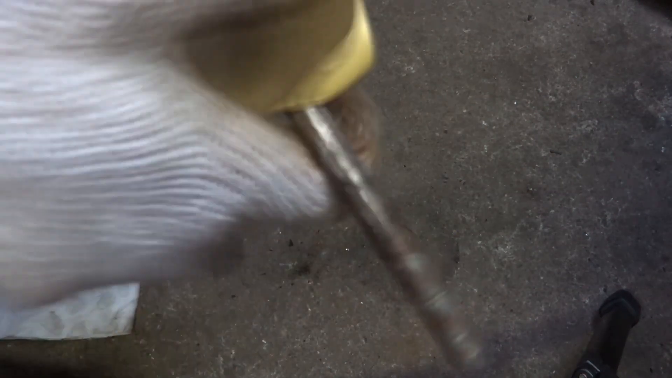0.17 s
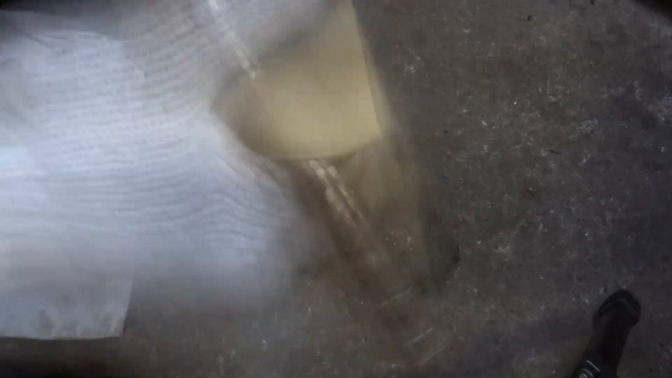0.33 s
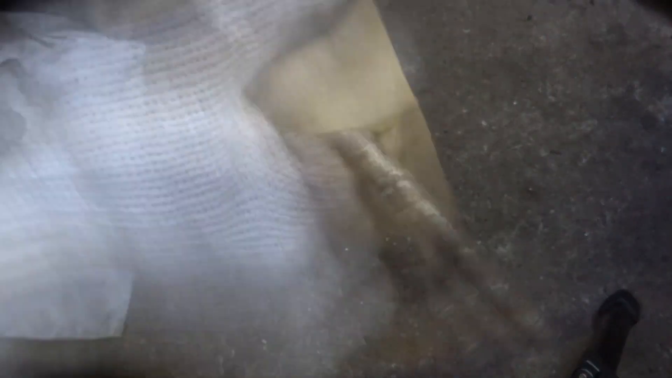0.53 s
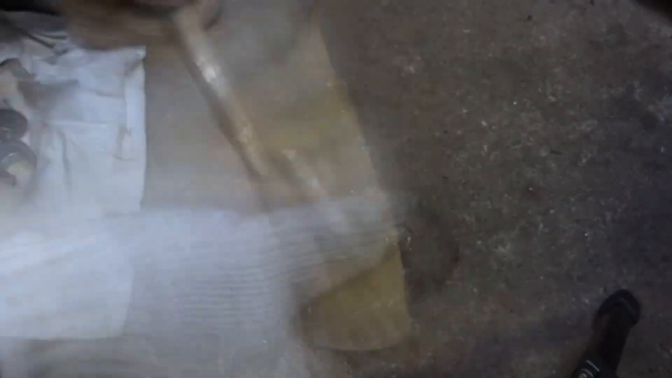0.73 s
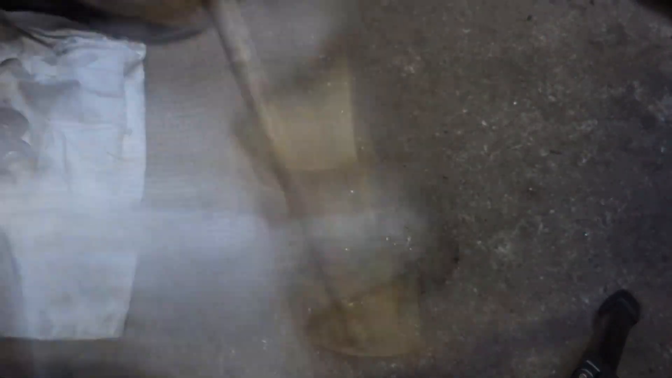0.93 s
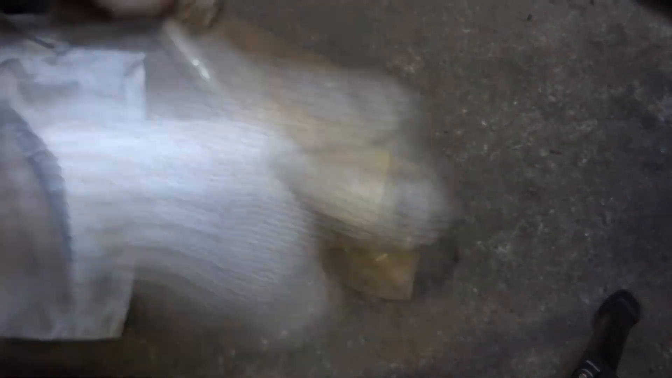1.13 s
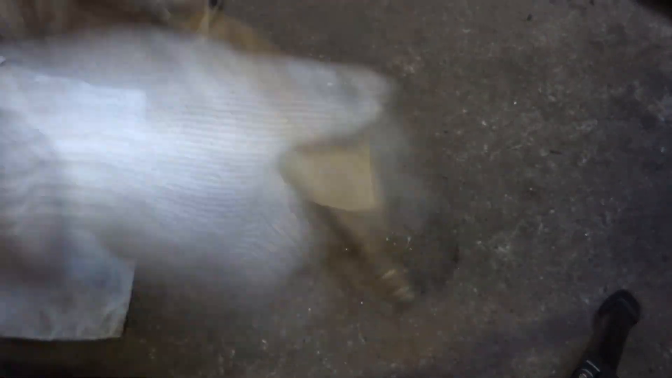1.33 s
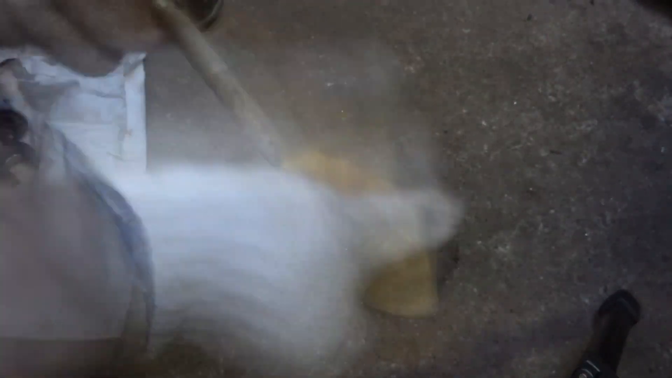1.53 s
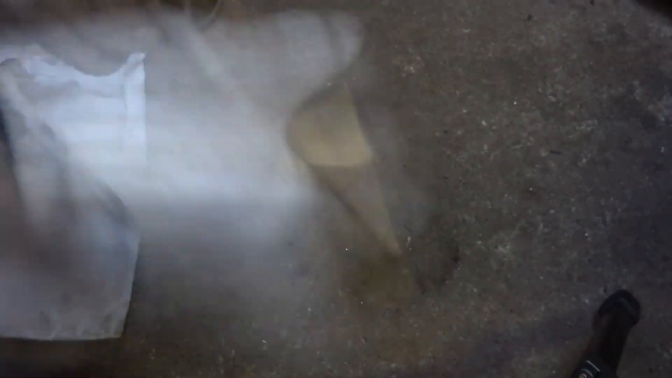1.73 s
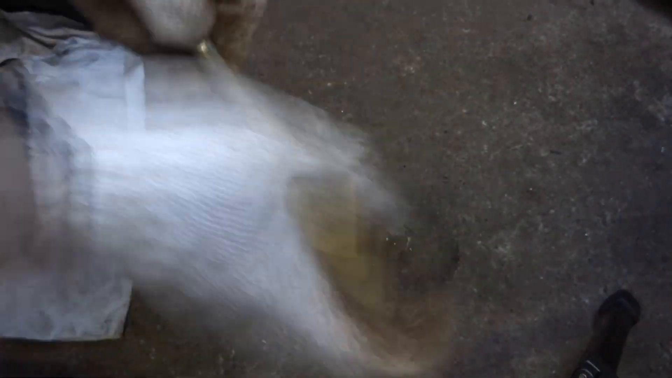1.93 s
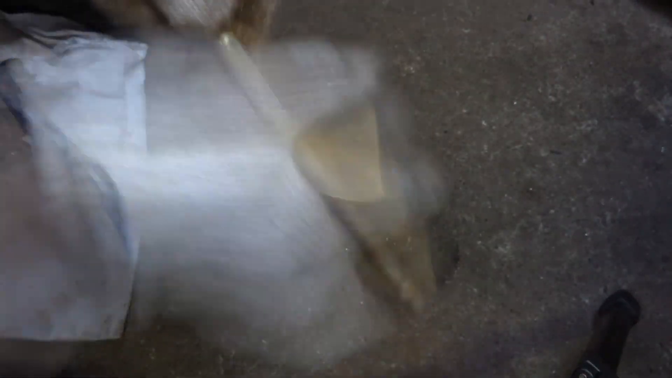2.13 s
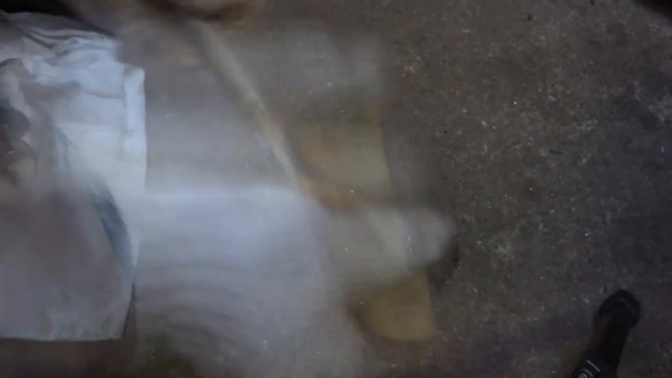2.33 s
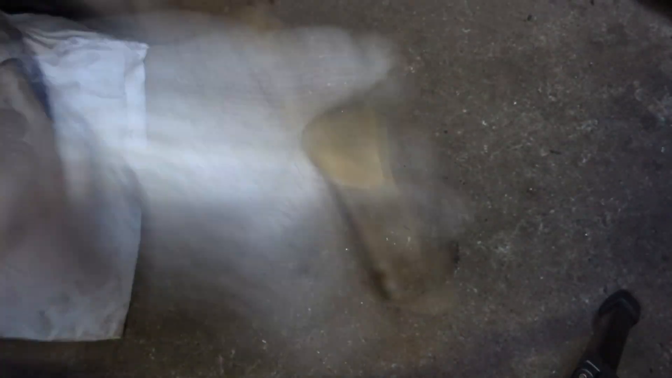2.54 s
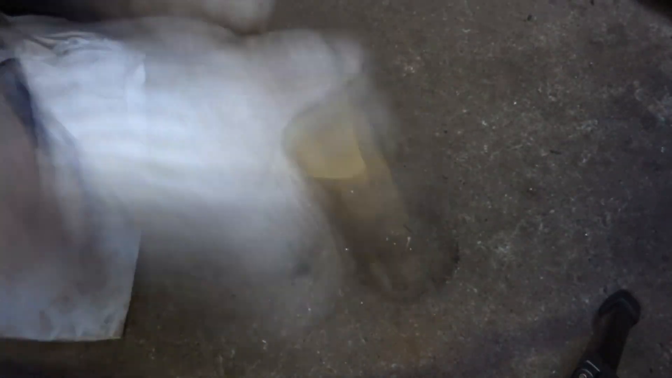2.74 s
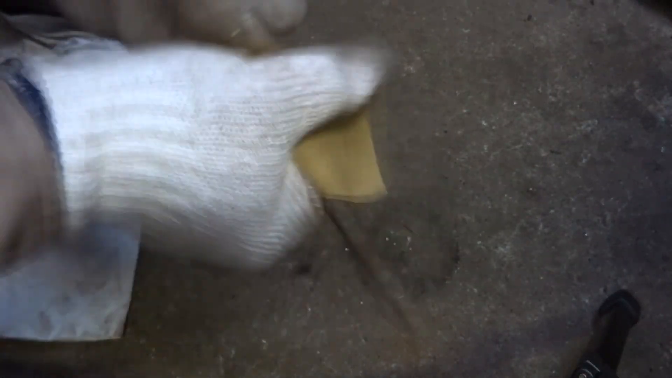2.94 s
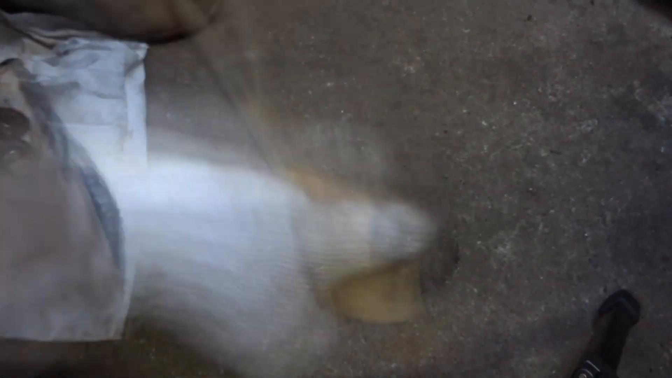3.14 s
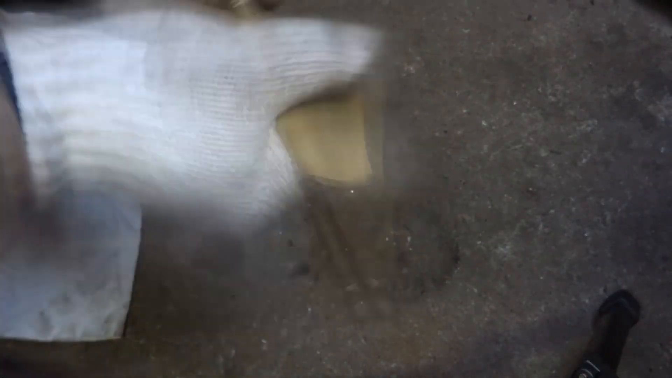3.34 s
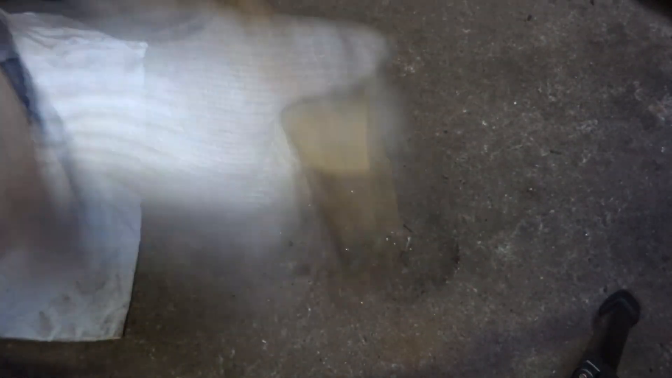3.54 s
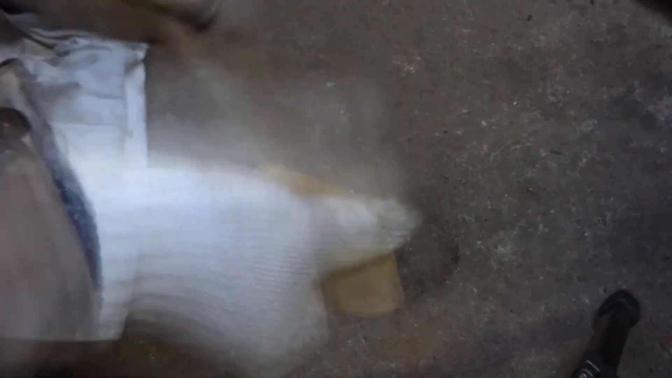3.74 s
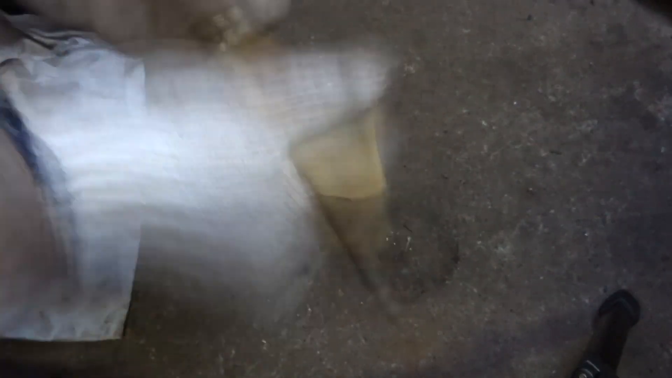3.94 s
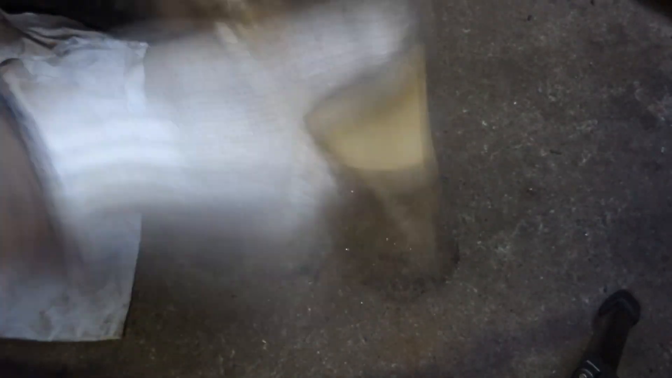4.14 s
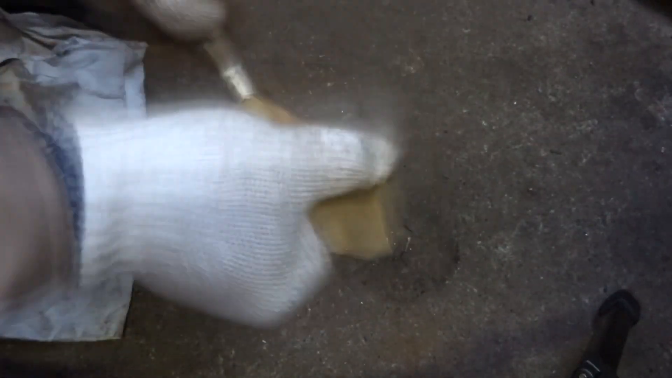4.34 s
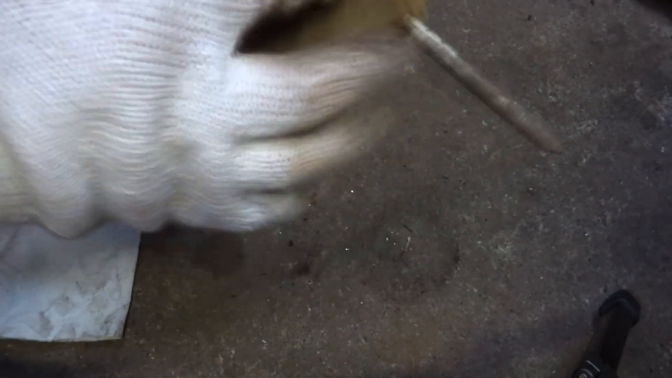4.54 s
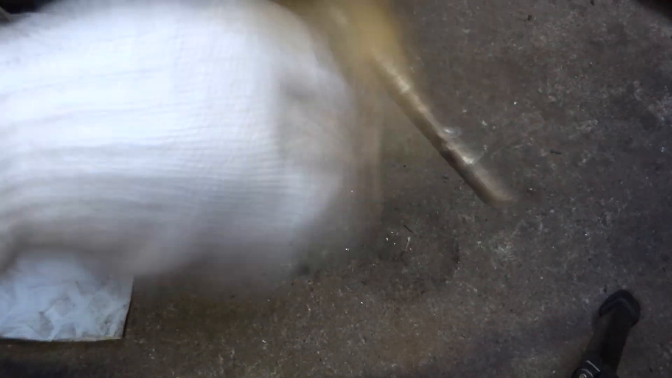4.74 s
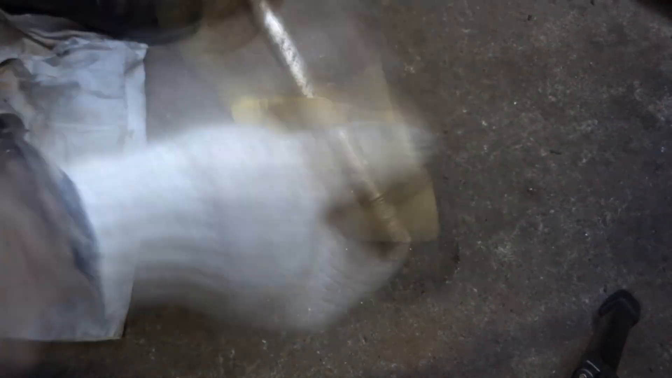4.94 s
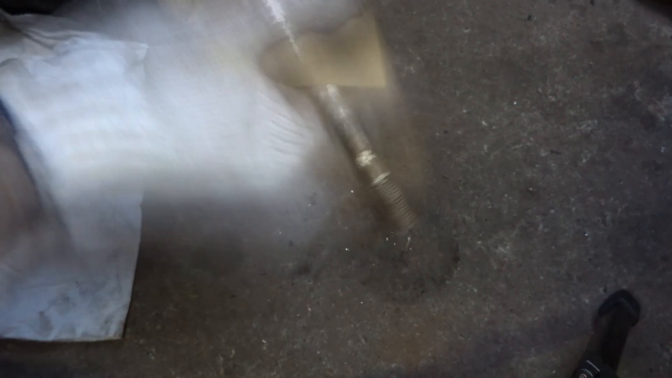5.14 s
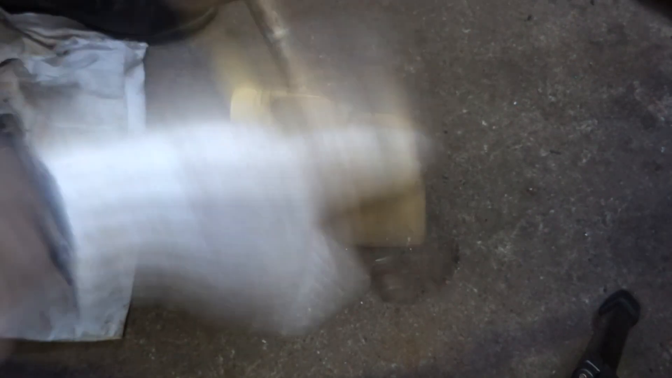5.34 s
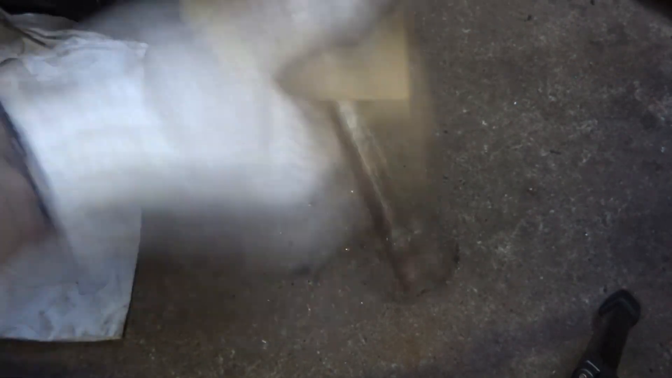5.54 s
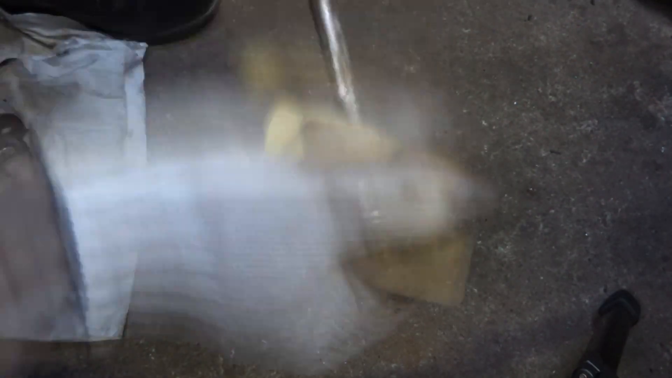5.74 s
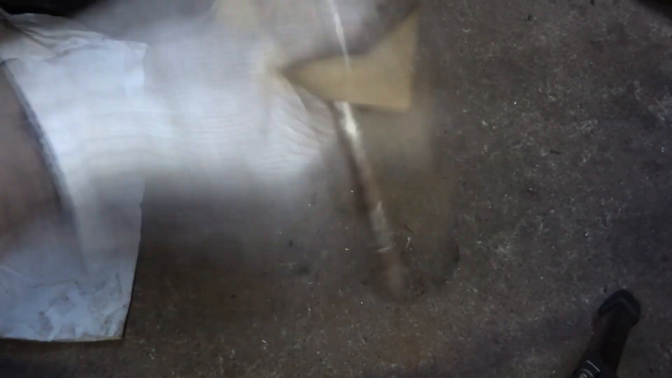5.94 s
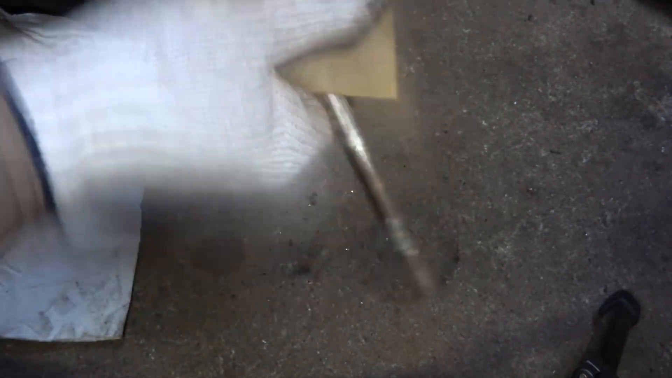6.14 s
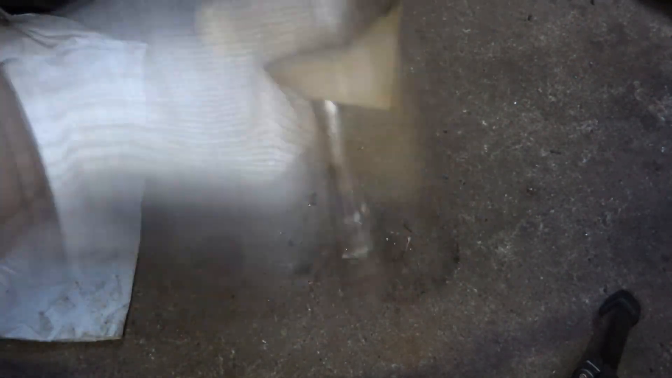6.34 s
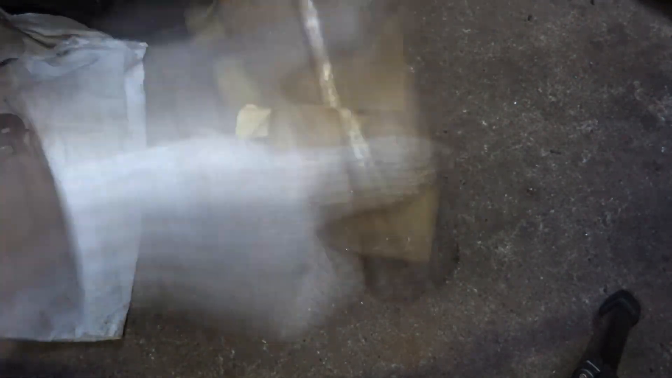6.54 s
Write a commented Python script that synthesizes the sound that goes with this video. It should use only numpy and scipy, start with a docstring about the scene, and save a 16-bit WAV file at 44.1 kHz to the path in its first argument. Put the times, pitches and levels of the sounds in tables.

```python
"""In a workshop, sandpaper in a gloved hand is rubbed up and down a thin rusty steel rod, close to the microphone;
it sounds sped up, about 33 strokes a second, with short pauses to turn the rod. Random grain impacts, shaped by
the stroke speed, hiss directly, rasp through the resonances of the folded paper and ring dully through those of
the rod. Damped tones under short cracks make snaps and knocks; short diffuse tails follow; the background is
noise, rumble and two hums."""
import sys
import numpy as np
from scipy import signal
from scipy.fft import rfft, irfft, next_fast_len
from scipy.io import wavfile
from scipy.ndimage import uniform_filter1d, map_coordinates

SR = 44100
rng = np.random.default_rng(int(sys.argv[2]) if len(sys.argv) > 2 else 0)


def voltage_ratio(level):
    """Linear amplitude factor for a level in decibels (scalar or array-like)."""
    return 10 ** (np.asarray(level, float) / 20)


def wav_record(signal):
    """Record a signal, one row per channel, as 16-bit PCM in the file named by sys.argv[1]."""
    frames = np.transpose(np.atleast_2d(signal))
    bounded = np.clip(frames, -1, 1)
    # unit amplitude maps onto the largest positive 16-bit level
    quanta = np.round(bounded * 32767).astype(np.int16)
    wavfile.write(sys.argv[1], SR, quanta)


N = 290164  # length in samples


def unit(x):
    """Scale to rms 1."""
    return x / np.sqrt(np.mean(x ** 2) + 1e-20)


def along(points, hz):
    """Read (frequency [Hz], value) points on a log frequency axis."""
    f, v = np.transpose(points)
    return np.interp(np.log(hz + 1), np.log(f + 1), v)


def curves(rows):
    """One value per sample for each column after the time."""
    s, *cols = np.transpose(rows)
    return [np.interp(np.arange(N) / SR, s, c) for c in cols]


def wobble(rate):
    """A smooth random curve with `rate` random knots a second."""
    return map_coordinates(rng.standard_normal(N // 100), [np.arange(N) * rate / SR])


def bells(rows):
    """Each row (time [s], level [dB], width [ms]) swells and fades as a bell; the powers of neighbours add."""
    t = np.arange(0, N + 44, 44) / SR  # a coarse clock of about 1 ms
    s, db, ms = np.transpose(rows)
    shape = np.exp(-.5 * ((t[:, None] - s) * 1000 / ms) ** 2)
    power = np.sum(voltage_ratio(2 * db) * shape, axis=1)
    return np.interp(np.arange(N) / SR, t, np.sqrt(power + 1e-9))


def filtered(x, response):
    """x times a (possibly complex) response of frequency."""
    m = next_fast_len(N + SR // 4)
    spectrum = rfft(x, m) * response(np.fft.rfftfreq(m, 1 / SR))
    return irfft(spectrum, m)[..., :N]


def coloured(x, spectrum):
    """x through a (frequency [Hz], level [dB]) spectrum, rms 1."""
    return unit(filtered(x, lambda hz: voltage_ratio(along(spectrum, hz))))


def resonant(x, modes):
    """x through resonances in phase, which leaves dips between them; rms 1."""
    def body(f):
        return sum(voltage_ratio(db) * 1j * f * w / (c * c - f * f + 1j * f * w) for c, w, db in modes)
    return unit(filtered(x, body))


def workshop():
    """Background: wide noise that rises and dips, a lumpy rumble and two hums wavering in pitch and level."""
    # background levels over time, before the trims below: (time [s], noise level [dB], hum level [dB])
    background = [(0, -59.5, -75), (.2, -58.5, -61), (.4, -59.5, -51.5), (.75, -59.5, -60),
                  (.85, -61.5, -56.5), (1.3, -66.5, -60), (1.5, -61, -59), (1.8, -63, -57),
                  (2.35, -62, -66.5), (2.5, -63, -60.5), (2.85, -58, -65), (3.15, -63, -66),
                  (3.5, -59.5, -67), (4.05, -62, -64), (4.18, -60.5, -62), (4.6, -57, -70),
                  (5.1, -65.5, -72), (5.35, -59.5, -65), (5.45, -65, -69), (6.2, -62, -66),
                  (6.58, -66, -66)]
    # lower hum over the upper, before the trims: (time [s], level [dB])
    hum_balance = [(0, -6), (2.3, 3.5), (4.1, -10), (5.1, 8.5), (6.58, 3)]
    # noise alike on both sides: (frequency [Hz], level per Hz [dB])
    centre_colour = [(40, -50), (200, -22.5), (270, -13.5), (320, -4.5), (400, -4), (440, 1), (480, -8.5),
                     (600, -5.5), (700, -11), (850, -3), (1100, -17), (2000, -22.5), (3100, -14),
                     (8000, -42), (16000, -45)]
    # noise opposed between the sides: (frequency [Hz], level per Hz [dB])
    side_colour = [(120, -52), (200, -27), (515, -6.5), (677, -15), (812, 4), (1010, -4), (1210, -2.5),
                   (1680, -2.5), (2380, -12), (3240, -12), (4180, -11), (5590, -16), (10000, -24),
                   (13200, -31), (15500, -38)]
    # low rumble: (frequency [Hz], level per Hz [dB])
    rumble_colour = [(20, -36), (60, -15), (100, 4), (115, -2), (134, 3), (200, -10.5), (300, -27)]
    # the rumble swells now and then: (time [s], level [dB], width [ms])
    rumble_swells = [(.15, -67, 64), (.72, -73.5, 120), (1.15, -75, 100), (1.6, -74, 120), (2.2, -68, 100),
                     (2.85, -68.5, 110), (3.5, -62.5, 56), (4.2, -67, 80), (4.78, -70, 110),
                     (5.52, -71, 50), (6.2, -76, 150)]
    noise_db, hum_db = curves(background)
    lower_db, = curves(hum_balance)

    mid = voltage_ratio(noise_db + 4 + 1.45 * wobble(8)) * coloured(rng.standard_normal(N), centre_colour)
    side = voltage_ratio(-58.0 + 1.3 * wobble(3.37)) * coloured(rng.standard_normal(N), side_colour)

    lumps = unit(voltage_ratio(1.1 * wobble(12)) * coloured(rng.standard_normal(N), rumble_colour))
    rumble = np.hypot(voltage_ratio(-78), bells(rumble_swells)) * lumps  # -78 dB floor under the swells

    def hum(hz):
        waver = np.sqrt(2) * voltage_ratio(2.4 * wobble(18))
        return waver * np.sin(2 * np.pi * np.cumsum(hz + 4 * wobble(30)) / SR)
    upper = voltage_ratio(hum_db - 3.0) * hum(550)
    lower = voltage_ratio(hum_db + lower_db - 4.0) * hum(518)
    hums = upper * voltage_ratio([[1.2], [-1.2]]) + lower * voltage_ratio([[1.4], [-1.4]])  # both lean left
    return mid + rumble + hums + side * np.array([[1], [-1]])


def hand_speed():
    """Runs of nearly even strokes, and the drags between them, each a bell of speed."""
    # even up-and-down strokes: (first stroke [s], last stroke [s], strokes [count],
    # first level [dB], last level [dB])
    stroke_runs = [(0.068, 0.143, 3, -28.5, -33), (0.277, 0.427, 6, -28, -29.5),
                   (0.586, 0.616, 2, -29, -29.5), (0.715, 0.928, 8, -29, -28), (0.951, 1.148, 8, -28, -26),
                   (1.173, 1.541, 14, -25.5, -28), (1.572, 1.717, 6, -26.5, -29),
                   (1.746, 1.838, 4, -28.5, -28.5), (2.044, 2.269, 9, -29.5, -29),
                   (2.297, 2.445, 6, -28.5, -28), (2.544, 2.73, 7, -28.5, -29),
                   (2.766, 2.958, 7, -29.5, -29.5), (3.094, 3.191, 4, -28.5, -30),
                   (3.221, 3.371, 6, -28, -30.5), (3.47, 3.567, 4, -29, -30.5),
                   (3.594, 3.748, 6, -28.5, -31), (3.777, 3.843, 3, -30.5, -28.5),
                   (3.888, 3.989, 4, -29, -31), (4.079, 4.226, 6, -28.5, -27.5),
                   (4.259, 4.334, 4, -26.5, -27.5), (4.857, 4.95, 4, -26, -25.5),
                   (4.98, 5.17, 8, -26.5, -26), (5.2, 5.228, 2, -27, -27), (5.366, 5.74, 14, -27, -26),
                   (5.769, 5.944, 7, -26.5, -26), (5.977, 6.096, 5, -27, -27),
                   (6.201, 6.336, 5, -27.5, -27), (6.362, 6.582, 8, -26.5, -27)]
    # lone strokes and light drags while the rod is turned: (time at top speed [s], level [dB], width [ms])
    drags = [(.15, -34.5, 16), (.176, -44, 110), (.548, -52, 4.6), (1.895, -55, 4.2), (2.486, -48, 5.2),
             (4.806, -44, 3.3), (.463, -39.5, 7.7), (.506, -44, 25), (0.51, -30.5, 7), (.643, -42, 17),
             (1.843, -46.5, 22), (1.919, -53, 12), (1.972, -33, 11.5), (2.014, -31.5, 7.2), (2.44, -46, 32),
             (2.97, -38, 13.8), (3.066, -44.5, 16.5), (3.385, -37, 14.8), (4.05, -47, 14),
             (4.365, -32, 9.5), (4.438, -39.5, 8), (4.506, -41, 38.5), (4.534, -38, 5.8), (4.587, -42, 7.6),
             (4.643, -37.5, 9.6), (4.727, -46, 26), (4.767, -31.5, 9.8), (4.828, -33.5, 5),
             (5.25, -41.5, 24), (5.322, -41, 15), (5.331, -34.5, 6), (6.1, -41.5, 21), (6.161, -50, 5)]
    uneven_db, uneven_ms = 0.47, .6  # scatter of the hand
    strokes = []
    for first, last, count, first_db, last_db in stroke_runs:
        late, strong = rng.standard_normal((count, 2)).T
        s = np.linspace(first, last, count) + uneven_ms * late / 1000
        db = np.linspace(first_db, last_db, count)
        share = 0.27 + .012 * (db + 28)  # bell width over period; harder strokes run together
        period_ms = 1000 * (last - first) / (count - 1)
        strokes += zip(s, db + uneven_db * strong, share * period_ms)
    return bells(strokes + drags)


def grit(spiky_db, patchy_db):
    """Dense grain impacts of uneven size; moving fingers damp changing patches of the spectrum."""
    size_db = spiky_db * np.minimum(rng.standard_exponential(N), 4.5)
    grains = rng.standard_normal(N) * voltage_ratio(size_db)
    z = signal.stft(grains, nperseg=256)[2]
    field = uniform_filter1d(rng.standard_normal(z.shape), size=2, axis=0)  # across frequency
    field = uniform_filter1d(field, size=25, axis=1)  # along time
    return signal.istft(z * voltage_ratio(patchy_db * unit(field)), nperseg=256)[1][:N]


def held_rod(grains):
    """Each hold rings with its own resonances; one fades into the next."""
    # the resonances change each time the fingers take a new hold:
    # (start [s], [(centre [Hz], width [Hz], level [dB]), ..])
    holds = [(0, [(2600, 1500, 5), (3430, 1100, -8), (4380, 500, 1), (5700, 500, -7)]),
             (.24, [(2780, 410, 5.5), (3700, 550, 0), (4700, 710, 0), (5600, 360, -14)]),
             (.46, [(2530, 500, -2), (3470, 960, 3.5), (4640, 650, 2), (5400, 470, -13)]),
             (.69, [(2580, 450, -1), (3400, 900, 5), (4300, 830, 3), (5300, 490, -6)]),
             (1.1, [(2620, 450, -2), (3600, 660, 4), (4560, 420, 2), (5700, 510, -1.5)]),
             (1.92, [(2490, 300, 2), (3370, 520, 3.5), (4200, 390, 1), (5270, 700, -8)]),
             (2.5, [(2640, 370, -2), (3470, 450, 6), (4360, 600, -3), (5500, 700, -11)]),
             (3.03, [(2860, 870, -4), (3360, 320, 6), (3780, 200, 3), (4420, 670, -1.5), (5270, 540, -5)]),
             (3.43, [(3180, 410, 6), (3730, 870, 3), (4500, 780, 0), (5600, 990, 2)]),
             (4.03, [(2950, 630, -7), (3630, 1200, 11), (4540, 1400, -3), (5700, 460, -7)]),
             (4.4, [(1960, 300, 10), (3220, 520, 7), (3900, 250, -7), (4860, 450, -2), (5800, 460, -12)]),
             (4.6, [(2010, 270, 8), (3100, 610, 8), (4500, 600, -2), (5500, 390, -5)]),
             (4.74, [(2220, 250, 6), (3150, 530, 3.5), (3920, 820, -2), (5300, 470, -12)]),
             (5.3, [(3000, 580, -5), (3750, 810, -1), (4970, 710, -1.5), (5570, 570, -2)]),
             (5.75, [(3070, 410, 1), (3850, 1200, 6), (4670, 400, -2), (5570, 640, 0)]),
             (6.15, [(3200, 550, -2), (3850, 790, 1), (4540, 1100, -4), (5600, 250, 0)])]
    starts = [s for s, _ in holds]
    hold = np.searchsorted(starts, np.arange(N) / SR, side="right") - 1
    rod = 0
    for k, (_, modes) in enumerate(holds):
        fade = np.sqrt(np.abs(uniform_filter1d((hold == k) * 1., size=1300)))  # equal power
        rod = rod + fade * resonant(grains, modes)
    return rod


def sanding():
    """Grains hiss in the air, shake the paper and ring the rod, all driven by the stroke speed."""
    # how the hand folds and presses the sheet, before slack and swing:
    # (time [s], paper level [dB], rod level [dB], coarse grit level [dB], fine grit level [dB])
    grip = [(0, -12, 2, -3, 2), (.07, -7.5, -6.5, -4, -2), (.16, -8, -4.5, -3, -5), (.24, -7, -7, -1, -5),
            (.29, -5.5, -4, -5, -3.5), (.4, -9.5, -3, -5.5, -2), (.48, -7.5, -5, -9, -9),
            (.52, -7, -2, -5, -2.5), (.75, -8, -5.5, -7, -3.5), (1.05, -12.5, -6, -5.5, -7.5),
            (1.5, -14.5, -2.5, -4.5, -7), (1.8, -14, -4.5, -2.5, -3), (1.85, -6, 1, -12, -10),
            (1.91, -6.5, -12, -2, -5), (1.97, -7.5, -1.5, -8, -11), (2.06, -13, -6, -4.5, -3.5),
            (2.55, -13.5, -7, -5, -6.5), (2.8, -8.5, -6.5, -4.5, -6), (2.99, -9.5, -7, -4, -5),
            (3.05, -11.5, -3.5, -5, -9), (3.11, -9, -6, -6, -7), (3.7, -12.5, -3.5, -5.5, -4),
            (4.32, -9, -6.5, -5.5, -10), (4.47, -14.5, -1, -3, -8), (4.535, -11.5, -2.5, -11, 5.5),
            (4.6, -15.5, -7.5, -1, -1), (4.72, -10, -3, -7.5, -5), (4.87, -5.5, -6.5, -5, -7),
            (5, -11, -6.5, -5, -5), (5.22, -11, -8, -4.5, -5.5), (5.28, -5.5, -0.5, -4.5, -1),
            (5.4, -13, -7, -6, -5.5), (5.8, -13, -6, -6, -6), (6.2, -10.5, -6, -3.5, -4.5),
            (6.58, -9.5, -5, -5.5, -5.5)]
    # resonances of the folded paper: (centre [Hz], width [Hz], level [dB])
    paper_modes = [(1087, 530, -5), (1448, 120, -7.5), (2032, 880, -2)]
    # hiss of the coarse grit: (frequency [Hz], level per Hz [dB])
    coarse_colour = [(2500, -32), (5000, -0.5), (6500, 2), (8000, 1.5), (9800, 0), (11500, -8),
                     (15000, -97)]
    # hiss of the fine grit: (frequency [Hz], level per Hz [dB])
    fine_colour = [(5000, -52), (9000, -13), (11000, 8.5), (13000, 12.5), (15000, 10), (15700, 4),
                   (16000, -1)]
    paper_db, rod_db, coarse_db, fine_db = curves(grip)
    speed = hand_speed()
    slow = uniform_filter1d(speed, size=1400)
    swing = speed / slow  # fast mid-stroke, slow at the turns

    # a slack grip frees the paper and dulls the grit: dB gained for each dB of slack
    slack_db = np.clip(-30.5 - 20 * np.log10(slow), 0, 12)
    paper_db = paper_db + 0.63 * slack_db
    rod_db = rod_db + 0.093 * slack_db
    coarse_db = coarse_db - 0.043 * slack_db
    fine_db = fine_db - 0.41 * slack_db

    def small(hz):  # a small sheet radiates no bass
        return 1 / (1 + (750 / (hz + 1)) ** 4)

    def thin(hz):  # a thin rod even less
        return 1 / (1 + (1750 / (hz + 1)) ** 6)

    rasp = filtered(resonant(grit(spiky_db=0.5, patchy_db=1.96), paper_modes), small)
    ring = filtered(held_rod(grit(spiky_db=2.0, patchy_db=1.57)), thin)
    grains = grit(spiky_db=2.0, patchy_db=1.2)
    paper = voltage_ratio(paper_db) * swing ** -.3 * rasp
    rod = voltage_ratio(rod_db) * swing ** -.1 * ring
    coarse = voltage_ratio(coarse_db) * coloured(grains, coarse_colour)
    fine = voltage_ratio(fine_db) * swing ** 0.33 * coloured(grains, fine_colour)
    return speed * (paper + rod + coarse + fine)


def knocks():
    """Paper snaps and hand knocks: a dull ring of three damped tones under a short noise crack."""
    # snaps of the paper and knocks of the hand on the rod: (time [s], level [dB], pitch [Hz], t60 [s])
    hits = [(.055, -34, 447, 0.025), (.248, -32.5, 624, 0.018), (0.285, -23.5, 1630, 0.013),
            (0.39, -20.5, 1280, .006), (0.501, -38, 1270, 0.027), (.703, -34, 2920, .01),
            (1.948, -30, 2220, 0.011), (1.96, -26.5, 2250, 0.045), (2.639, -32, 1210, 0.015),
            (3.213, -38, 700, 0.019), (3.317, -30.5, 840, 0.034), (3.654, -35, 735, 0.021),
            (4.631, -29, 3000, 0.0071), (4.72, -30, 2200, 0.0069), (4.805, -23, 2300, 0.0074),
            (4.87, -25, 1120, 0.011), (5.265, -30, 1150, 0.013), (5.301, -30, 920, .015),
            (5.331, -35.5, 625, 0.046), (5.346, -43, 600, .02), (6.391, -32, 990, 0.02)]
    out, t = np.zeros(N + SR), np.arange(SR // 10) / SR
    for s, db, hz, t60 in hits:
        phase = 2 * np.pi * hz * t
        tones = np.sin(phase) + .5 * np.sin(0.538 * phase) + 0.57 * np.sin(1.42 * phase)
        ring = voltage_ratio(-60 * t / t60) * tones * (1 - np.exp(-t / 0.00025))  # soft onset
        crack = 0.24 * voltage_ratio(-60 * t / 0.0039) * rng.standard_normal(len(t))
        out[round(s * SR):][:len(t)] += voltage_ratio(db) * (ring + crack)
    return filtered(out[:N], lambda hz: (1j * hz / (280 + 1j * hz)) ** 2)  # small things give no bass


def diffuse_sound(x):
    """A fresh random stereo tail every eighth of a second; each frequency dies at its own speed."""
    # decay of the diffuse sound: (frequency [Hz], t60 [s])
    decay = [(500, 0.1), (3000, 0.048), (12000, 0.015)]
    # colour of the diffuse sound: (frequency [Hz], level [dB])
    diffuse_colour = [(300, -3), (2000, -4.5), (3300, -2), (4700, 1), (6800, -1), (9300, 4), (12500, 1.5),
                      (16000, 1)]
    step, out = SR // 8, np.zeros((2, N + SR))
    for start in range(0, N, step):
        hz, t, z = signal.stft(rng.standard_normal((2, SR // 5)), SR, nperseg=256)
        dying = voltage_ratio(-60 * t / along(decay, hz)[:, None])
        tail = signal.istft(z * dying, SR, nperseg=256)[1]
        tail = tail / np.linalg.norm(tail[0])
        wet = signal.fftconvolve(x[None, start:start + step], tail, axes=1)
        out[:, start + 150:][:, :wet.shape[1]] += wet  # 150 samples late, about 3.4 ms
    return filtered(out[:, :N], lambda hz: voltage_ratio(along(diffuse_colour, hz)))


def scene():
    """Hands near and centred, a little diffuse sound around them, the workshop behind."""
    near = sanding() + knocks()
    return near + voltage_ratio(-17.5) * diffuse_sound(near) + workshop()


def roll_off(x):
    """The treble ends steeply here."""
    return signal.sosfilt(signal.butter(12, 16710, fs=SR, output="sos"), x)


def record(dry):
    """The microphone drops deep bass and has a narrow dip; then everything above 15980 Hz is cut off."""
    def microphone(hz):
        dip = 1 - 0.18 * np.exp(-.5 * ((hz - 1680) / 70) ** 2)
        bass = 1 / (1 + (45 / (hz + 1)) ** 3)
        return dip * bass
    heard = filtered(dry, lambda hz: microphone(hz) * (hz < 15980))
    return roll_off(heard)


dry = scene()
out = record(dry)
wav_record(out)
```